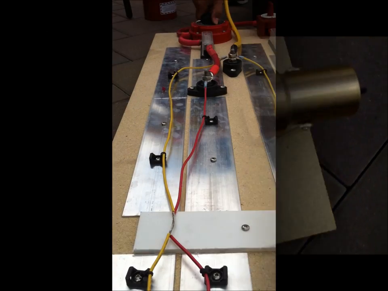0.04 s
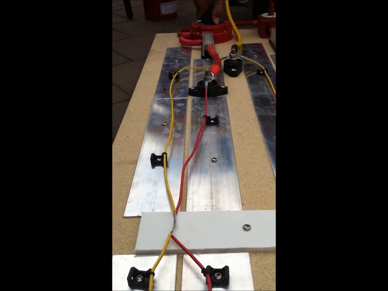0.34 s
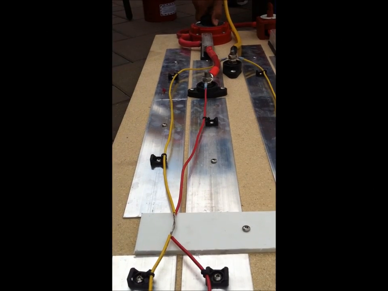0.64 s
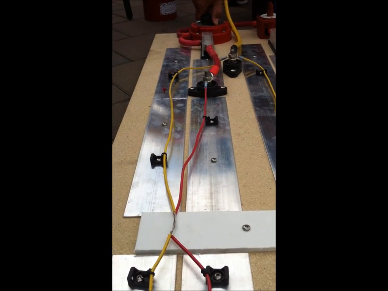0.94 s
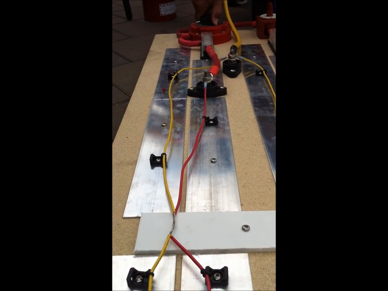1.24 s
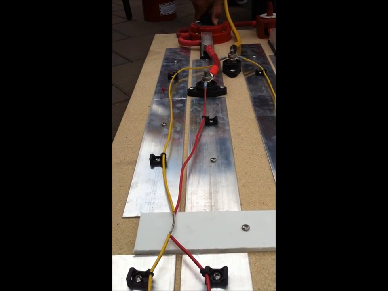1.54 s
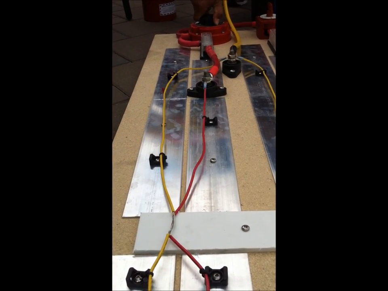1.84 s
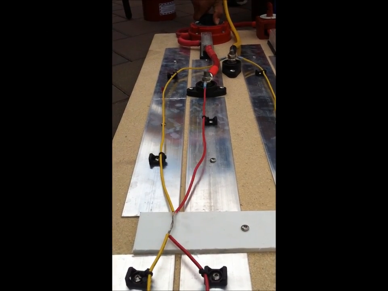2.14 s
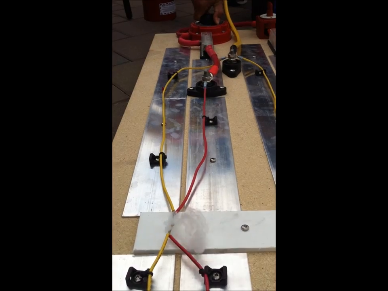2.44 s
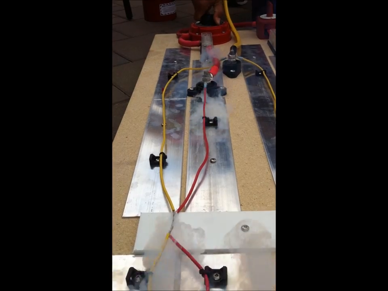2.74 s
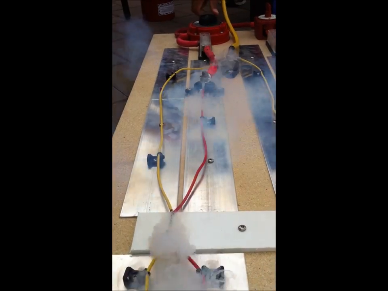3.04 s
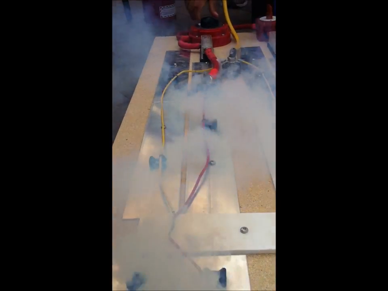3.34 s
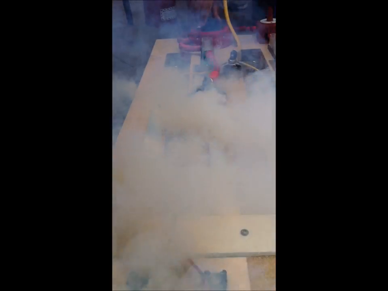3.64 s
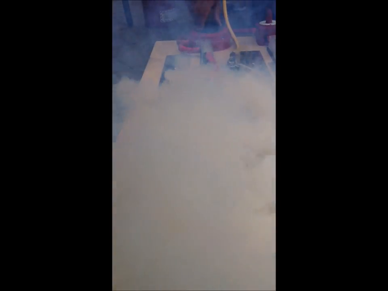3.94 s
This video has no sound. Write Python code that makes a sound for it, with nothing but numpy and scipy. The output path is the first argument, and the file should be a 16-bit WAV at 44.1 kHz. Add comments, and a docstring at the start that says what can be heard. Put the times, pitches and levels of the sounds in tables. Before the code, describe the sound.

Sharp snaps and sizzling come from shorted wires close to the microphone indoors. After a brief rumble, a dull knock, a faint hum and light ticking, the insulation bursts loudly and keeps crackling as a bright hiss grows.

```python
"""Shorted wires overheat on a test board in a workshop, heard close up.
A rumble ends in a dull knock, then a faint hum and a thin whine swell and fade.
The wires expand with heat and slip in their clamps, ticking and exciting the modes of clamp and board.
Smoke hisses out of the insulation, which bursts with sharp snaps and goes on crackling.
The snaps push the recorder's gain down, so the hiss swells again as the gain recovers."""
import sys
import numpy as np
from scipy import signal
from scipy.fft import rfft, irfft
from scipy.io import wavfile
from scipy.ndimage import uniform_filter1d

SR = 44100
rng = np.random.default_rng(int(sys.argv[2]) if len(sys.argv) > 2 else 0)


def generate_wav(sig):
    """Save sig (samples, or channels by samples) to the path in sys.argv[1] as 16-bit PCM at SR."""
    pcm = np.round(np.clip(np.atleast_2d(sig).T, -1, 1) * 32767).astype(np.int16)
    wavfile.write(sys.argv[1], SR, pcm)


N = 176400
TIME = np.arange(N) / SR

# Noise spectra: frequency_hz, relative_density_db
ROOM_SPECTRUM = [(15, -73), (25, -45), (32, -47), (69, -17), (176, 0), (221, 0), (728, -9), (874, -7),
                 (1480, -18.5), (2340, -25), (3790, -31), (4060, -30.5), (4560, -34), (6000, -34),
                 (7800, -43), (13200, -120)]
RUMBLE_SPECTRUM = [(20, -1.5), (35, -7), (55, 2), (75, -2), (110, -2), (250, -14.5), (800, -15.5),
                   (1500, -34.5), (4000, -61)]
MIC_SPECTRUM = [(1500, -19), (5000, -6), (8000, -1), (16000, -0.5)]
GRIT_SPECTRUM = [(200, -17), (600, -11), (1500, 0.5), (4500, 3.5), (8000, -6.5), (11000, 0.5), (12200, -7),
                 (16000, -7)]
JET_SPECTRUM = [(1000, -33), (4000, -12.5), (8000, -8), (9300, -3.5), (11000, 0.5), (12600, 3), (14200, 1),
                (16000, -3)]
SIZZLE_SPECTRUM = [(120, -10), (400, -15), (900, -2.5), (1800, -0.5), (2800, 3), (3250, -3), (4200, 2.5),
                   (7000, 1.5), (10000, 4), (16000, -0.5)]
SPUTTER_SPECTRUM = [(100, -18), (350, 2), (900, 5.5), (2000, 1), (4500, 0.5), (8000, -1.5), (12000, 9.5),
                    (16000, 1)]
# Modes of the knock, the clamped wire and the board: frequency_hz, gain_db, t60_s
KNOCK_RESONANCES = [(497, 2, 0.014), (730, -4, 0.0083), (1480, -24.5, 0.0073), (2220, -21, 0.0089),
                    (3870, -19.5, 0.0065)]
CLAMP_RESONANCES = [(2670, -5, 0.049), (2930, -13, 0.036), (3680, -6, .03), (4460, 2, 0.027),
                    (4730, -6, 0.028), (5400, -4, 0.035), (6400, -1, .02), (9300, -4, .018),
                    (11300, 4, .015)]
BOARD_RESONANCES = [(370, -6.5, 0.069), (547, 1.5, 0.026), (790, -4, 0.019), (1210, -10, 0.035)]
# Course of the hum, before its fade: time_s, pitch_hz, level_db
HUM_CONTOUR = [(.25, 168, -65), (.6, 170.2, -75), (.72, 171.2, -57), (1.0, 176, -52), (1.2, 180, -58),
               (1.5, 181, -69)]
# Slips of the wires: start_s, grit_db, treble_offset_db, ring_db, thud_db
WIRE_SLIPS = [(1.458, -73, -19, -85, -45.5), (1.482, -79, -15, -85, -46.5), (1.671, -75, -15, -85, -45.5),
              (1.689, -73, -21, -58, -50), (1.857, -61, -25, -77, -60), (1.873, -42, -3, -58, -41),
              (1.89, -43, -23, -56, -53), (1.895, -49, 1, -54, -68), (1.8987, -33, 6.5, -37, -55),
              (1.904, -43, -22, -44, -48), (1.92, -40.5, -5.5, -60, -60)]
# Escape of the smoke: time_s, jet_db, sizzle_db
SMOKE_LEVELS = [(2.745, -73, -91), (2.757, -54, -53.5), (2.78, -44.5, -51.5), (2.8, -44.5, -48),
                (2.86, -41, -61), (2.97, -46, -54.5), (3.09, -46, -55), (3.23, -38.5, -54),
                (3.45, -38.5, -48.5), (3.7, -36, -47), (3.89, -36, -45), (4.0, -40, -45.5)]
# Bursts of the insulation: start_s, crack_db, sputter_db, puff_db, thud_db
BURSTS = [(2.797, -28, -44, -39.5, -47), (2.8726, 2, -17, 1, -42), (2.8859, -3, -25, -21, -55),
          (2.9083, 7.5, -12, -19, -51), (3.0233, -23, -23, -35, -56), (3.127, -40, -43.5, -54, -43),
          (3.1628, -33, -30.5, -44, -33.5), (3.1652, -36, -31, -33.5, -50),
          (3.1823, -12.5, -34.5, -35, -50), (3.2567, -17, -31, -38, -46), (3.418, -11.5, -35, -35, -56),
          (3.4658, -25, -47, -50, -59), (3.4899, -19.5, -34.5, -40, -55), (3.5736, -16, -46.5, -55, -66),
          (3.6745, -18.5, -39.5, -53, -51)]

HUM_END_S, HUM_FADE_S = 1.53, 0.22
SLIP_T60_S, MIC_LOW_CUT_HZ = 0.013, 144
TIME_CONSTANTS_PER_T60 = np.log(1000)


def from_db(db):
    """Amplitude grows tenfold for every 20 dB."""
    return 10 ** (np.asarray(db) / 20)


def unit_rms(x):
    """Normalisation to unit mean power."""
    return x / np.sqrt(np.mean(x ** 2) + 1e-20)


def contours(rows):
    """Linear interpolation of each column over time."""
    times, *columns = np.transpose(rows)
    return [np.interp(TIME, times, column) for column in columns]


def coloured(x, spectrum):
    """Spectral shaping, at unit RMS."""
    hz, db = np.transpose(spectrum)
    bins_hz = np.maximum(np.arange(N // 2 + 1) * SR / N, 1)
    gain = from_db(np.interp(np.log(bins_hz), np.log(hz), db))
    return unit_rms(irfft(rfft(x) * gain, N))


def noise(spectrum):
    """Filtered white noise takes on the filter's spectrum."""
    return coloured(rng.standard_normal(N), spectrum)


def butterworth(x, hz, kind, order=2):
    """Maximally flat low- or high-pass filtering."""
    return signal.sosfilt(signal.butter(order, hz, kind, fs=SR, output="sos"), x + 1e-18)


def drift(rate_hz):
    """Low-passed noise wanders slowly; unit RMS."""
    return unit_rms(butterworth(rng.standard_normal(N + SR), rate_hz, "low")[SR:])


def impulses(start_s, db):
    """Impulsive excitation, one sample per event."""
    out = np.zeros(N)
    np.add.at(out, np.round(np.asarray(start_s) * SR).astype(int), from_db(db))
    return out


def decay(x, t60_s):
    """Exponential decay follows each impulse."""
    return signal.lfilter([1], [1, -from_db(-60 / (t60_s * SR))], x + 1e-18)


def resonator(x, hz, t60_s):
    """A damped oscillator answers an impulse with a decaying sine."""
    radius, angle = from_db(-60 / (t60_s * SR)), 2 * np.pi * hz / SR
    return signal.lfilter([0, np.sin(angle)], [1, -2 * radius * np.cos(angle), radius ** 2], x + 1e-18)


def modal_response(force, modes):
    """Superposition of damped modes, alternating in sign."""
    return sum((-1) ** k * from_db(db) * resonator(force, hz, t60_s)
               for k, (hz, db, t60_s) in enumerate(modes))


def workshop(start_db=-53.5, fall_db_per_s=0.8):
    """Dull background noise settles in a slow exponential decay."""
    air = butterworth(noise(ROOM_SPECTRUM), ROOM_SPECTRUM[-1][0], "low")
    return air * from_db(start_db - fall_db_per_s * TIME)


def rumble(level_db=-48, end_s=0.247, fade_s=0.021):
    """Noise with its power at low frequencies is heard as a rumble."""
    return noise(RUMBLE_SPECTRUM) * from_db(level_db) * np.clip((end_s - TIME) / fade_s, 0, 1)


def microphone_hiss(level_db=-73.5):
    """The microphone's self-noise sets a steady floor."""
    return from_db(level_db) * noise(MIC_SPECTRUM)


def knock(start_s=0.2128, force_db=-16, contact_hz=3530):
    """Soft contact low-passes a blow, which excites heavily damped modes."""
    blow = butterworth(impulses([start_s], [force_db]), contact_hz, "low")
    return modal_response(blow, KNOCK_RESONANCES)


def hum(waver_db=1.2):
    """A low sine glides upward under slow amplitude modulation."""
    pitch_hz, level_db = contours(HUM_CONTOUR)
    tone = unit_rms(np.sin(2 * np.pi * np.cumsum(pitch_hz) / SR))
    fall = np.clip((HUM_END_S - TIME) / HUM_FADE_S, 0, 1)
    return fall * tone * from_db(level_db + waver_db * drift(rate_hz=10))


def whine(start_s=0.6, pitch_hz=11360, bandwidth_hz=110, level_db=-78.5):
    """Narrow-band noise has a breathy pitch; it swells and fades with the hum."""
    rise, fall = np.clip(np.array([TIME - start_s, HUM_END_S - TIME]) / HUM_FADE_S, 0, 1)
    t60_s = TIME_CONSTANTS_PER_T60 / (np.pi * bandwidth_hz)
    band = unit_rms(resonator(rng.standard_normal(N), pitch_hz, t60_s))
    return rise * fall * from_db(level_db) * band


def slip_envelope(start_s, db, swell_s=0.0012, tail_db=-21, tail_t60_s=0.083):
    """A slip swells quickly, then decays in two stages: a fast drop and a faint rattle."""
    starts = impulses(start_s, db)
    level = decay(starts, SLIP_T60_S) + from_db(tail_db) * decay(starts, tail_t60_s)
    return uniform_filter1d(level, int(2 * swell_s * SR))


def wire_ticks(crossover_hz=7050):
    """Thermal expansion makes the wires slip; friction rings the clamps and nudges the board."""
    start_s, grit_db, treble_db, ring_db, thud_db = np.transpose(WIRE_SLIPS)
    grit = noise(GRIT_SPECTRUM)
    ticks = butterworth(grit, crossover_hz, "low") * slip_envelope(start_s, grit_db)
    ticks -= butterworth(grit, crossover_hz, "high") * slip_envelope(start_s, grit_db + treble_db)
    buildup = np.sqrt(SLIP_T60_S * SR / TIME_CONSTANTS_PER_T60)  # random pushes add in power
    for hz, mode_db, t60_s in CLAMP_RESONANCES:
        drive_db = ring_db + mode_db + treble_db * (hz > crossover_hz)
        scrape = rng.standard_normal(N) * slip_envelope(start_s, drive_db)
        ticks += resonator(scrape, hz, t60_s) / buildup
    return ticks + board_thuds(start_s, thud_db)


def board_thuds(start_s, db):
    """Impulses set the board into brief free vibration."""
    return modal_response(impulses(start_s, db), BOARD_RESONANCES)


def smoke(pops_per_s=200, pop_spread_db=5, fizz_db=-8, jet_flutter_db=0.3, sizzle_flutter_db=0.4):
    """A jet of fumes radiates bright noise over the sizzle and random pops of boiling plastic."""
    jet_db, sizzle_db = contours(SMOKE_LEVELS)
    jet = noise(JET_SPECTRUM) * from_db(jet_db + jet_flutter_db * drift(rate_hz=25))
    pop_sizes = from_db(pop_spread_db * np.minimum(rng.exponential(1, N), 4)) * rng.choice([-1, 1], N)
    pops = pop_sizes * (rng.random(N) < pops_per_s / SR)
    sizzle = noise(SIZZLE_SPECTRUM) + from_db(fizz_db) * coloured(pops, SIZZLE_SPECTRUM)
    sizzle *= from_db(sizzle_db + sizzle_flutter_db * drift(rate_hz=39))
    escaping = TIME > SMOKE_LEVELS[0][0]
    return butterworth((jet + sizzle) * escaping, MIC_LOW_CUT_HZ, "high")


def insulation_snaps(zing_db=-18.5, echo_db=-8.5, puff_time_constant_s=0.022):
    """Each burst is a pressure transient: a crack, an echoing sputter, a puff and a thud of the board."""
    start_s, crack_db, sputter_db, puff_db, thud_db = np.transpose(BURSTS)
    spikes, spurts = impulses(start_s, crack_db), impulses(start_s, sputter_db)
    zing = resonator(spikes, hz=13200, t60_s=0.0014)
    crack = spikes + from_db(zing_db) * np.roll(zing, -1)
    echo = from_db(echo_db) * decay(spurts, t60_s=0.057)
    sputter = noise(SPUTTER_SPECTRUM) * (decay(spurts, t60_s=0.012) + echo)
    puff = decay(impulses(start_s, puff_db), puff_time_constant_s * TIME_CONSTANTS_PER_T60)
    pressure = crack + np.roll(sputter - puff, 2) + board_thuds(start_s, thud_db)
    # The microphone's low cut turns each puff into a thump.
    return butterworth(pressure, MIC_LOW_CUT_HZ, "high", order=4)


def scene():
    """Pressures superpose at one microphone, which feeds both channels."""
    background = workshop() + rumble() + microphone_hiss()
    mono = background + knock() + hum() + whine() + wire_ticks() + insulation_snaps() + smoke()
    return np.array([mono, mono])


def record(dry, ceiling_db=-9, recovery_s=1.36, cutoff_hz=15750):
    """Peak limiting with instant attack and exponential recovery, followed by a steep low-pass."""
    peak = np.abs(dry).max(axis=0) + 1e-9
    needed_reduction = np.maximum(1 - from_db(ceiling_db) / peak, 1e-9)
    release = TIME / recovery_s
    reduction = np.exp(np.maximum.accumulate(np.log(needed_reduction) + release) - release)
    low_pass = signal.ellip(10, 0.1, 70, cutoff_hz, fs=SR, output="sos")
    return signal.sosfilt(low_pass, dry * (1 - reduction))


dry = scene()
out = record(dry)
generate_wav(out)
```